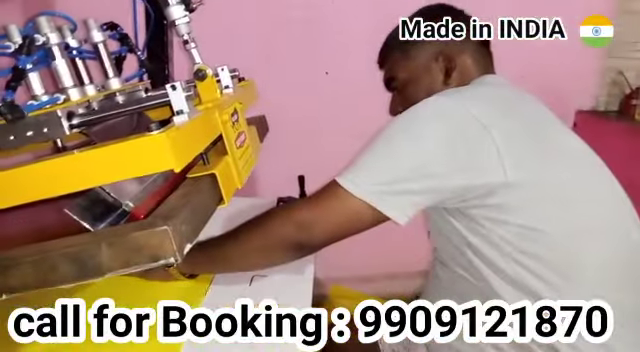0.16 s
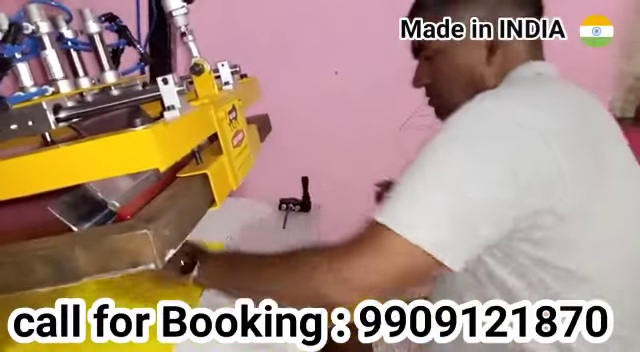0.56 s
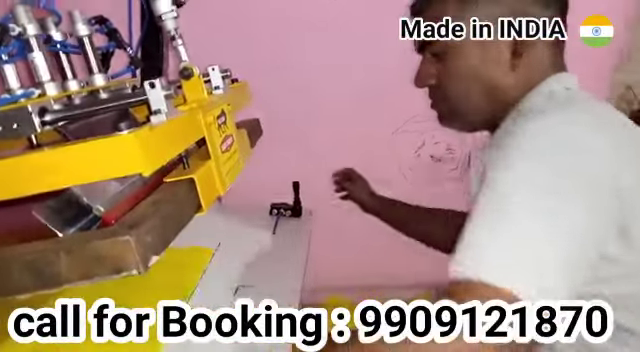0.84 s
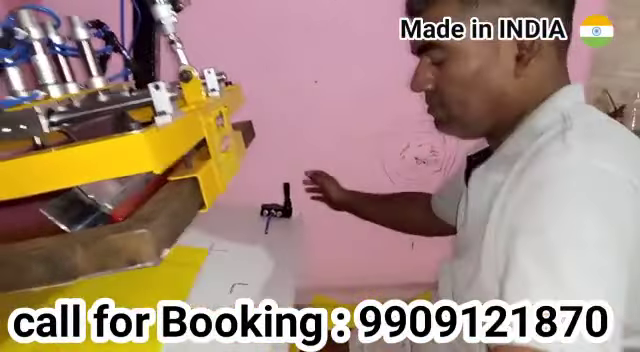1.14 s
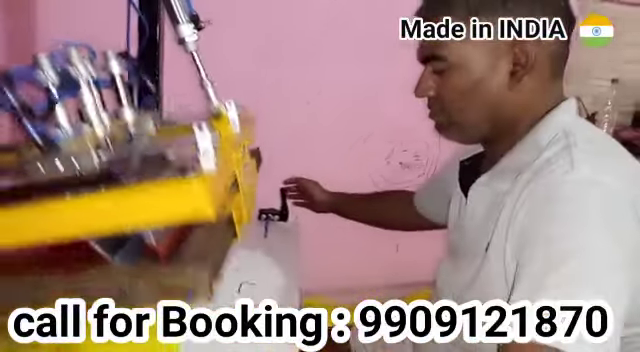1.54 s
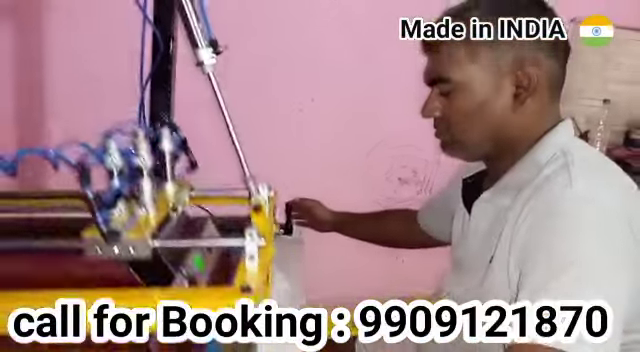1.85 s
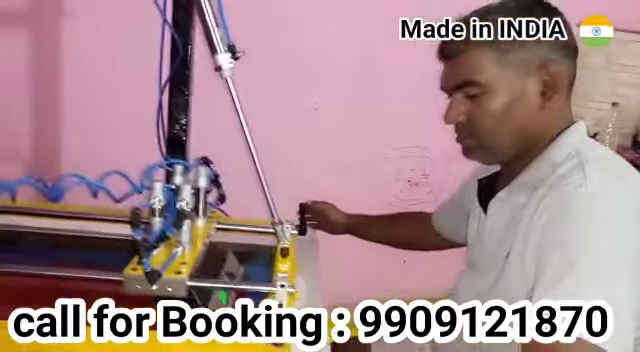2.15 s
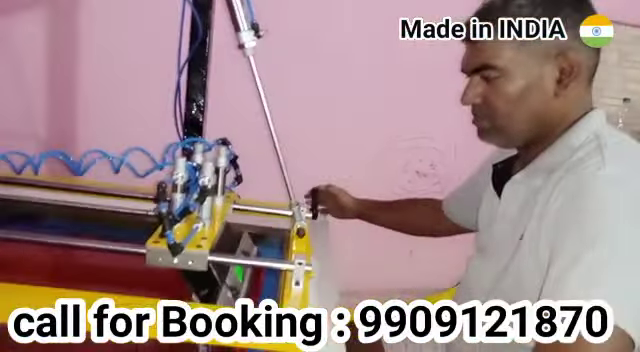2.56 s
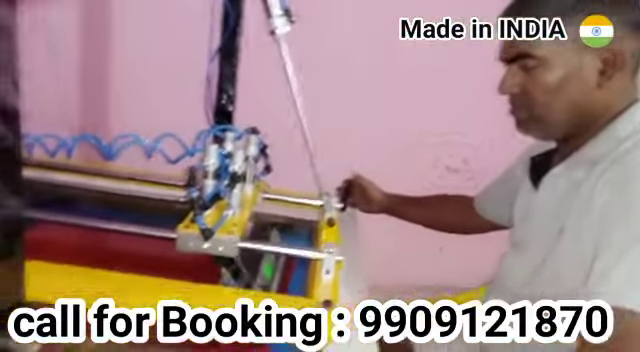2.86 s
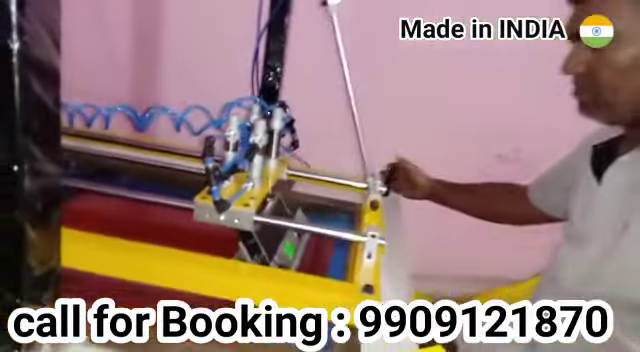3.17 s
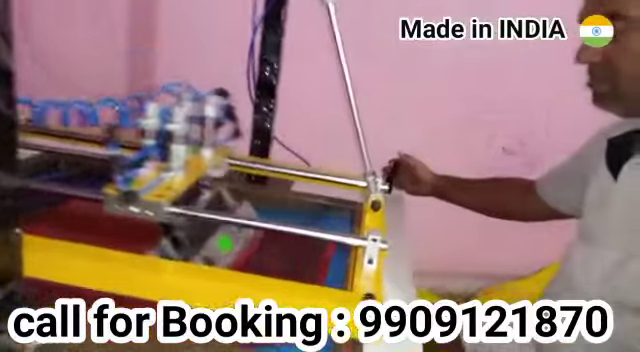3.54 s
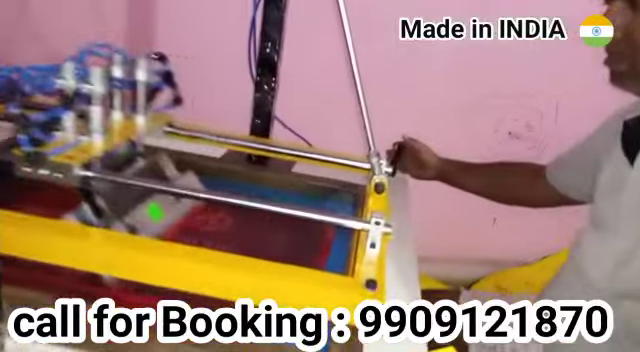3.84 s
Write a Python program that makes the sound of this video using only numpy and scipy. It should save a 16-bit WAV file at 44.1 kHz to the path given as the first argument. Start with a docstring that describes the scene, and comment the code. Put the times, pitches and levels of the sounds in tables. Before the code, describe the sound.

Pneumatic printing machine in a small workshop, close microphone: quiet leaking air and a table knock, a patchy hiss with clunks, a sharp crack and air burst, then a strong long hiss, metal boom and carriage rumble.

```python
"""Air-powered printing machine

In a small hard room a vent dies away and the table is knocked; then three air jets follow.
The frame drops, a valve pops and the carriage cylinder vents: all jets are noise with a colour.
The steel frame booms at each blow and rumbles while parts slide: noise through resonances.
Narrow noise makes whistles and a squeak, short bursts make ticks, a low murmur fills the room.
"""
import sys
import numpy as np
from scipy import signal
from scipy.io import wavfile
from scipy.ndimage import uniform_filter1d

SR = 44100
rng = np.random.default_rng(int(sys.argv[2]) if len(sys.argv) > 2 else 0)


def log_audio(samples):
    """Write samples as a 16-bit WAV file to the path given in sys.argv[1]."""
    # one column per channel
    frames = np.atleast_2d(samples).T
    # limit to full scale, then quantise
    limited = np.clip(frames, -1, 1)
    pcm = np.round(limited * 32767).astype(np.int16)
    wavfile.write(sys.argv[1], SR, pcm)


N = 176400
T = np.arange(N) / SR  # time [s]
PATCH_DB, CALM_PATCH_DB = 5.5, 2.5  # how strongly patches of noise swell and thin out
SPLIT_HZ, LOW_TREBLE_SPLIT_HZ = (1900, 7500), (3000, 7600)  # lower hiss | main hiss | treble


def amp(db):
    """Turns decibels into a gain."""
    return 10 ** (np.asarray(db) / 20)


def evened(x):
    """Scales a signal to an average (RMS) strength of 1."""
    return x / np.sqrt(np.mean(x ** 2) + 1e-20)


def curve(rows, col):
    """Reads a level column as gain, practically silent outside the table."""
    rows = np.array(rows)
    return amp(np.interp(T, rows[:, 0], rows[:, col], left=-150, right=-150))


def band(x, lo_hz, hi_hz):
    """Keeps only the sound between two frequencies."""
    return signal.sosfilt(signal.butter(4, [lo_hz, hi_hz], "band", fs=SR, output="sos"), x)


def resonate(x, hz, width):
    """A resonance of gain 1 whose pitch may move."""
    turn = np.exp(2j * np.pi * np.cumsum(hz * np.ones(len(x))) / SR)
    r = np.exp(-np.pi * width / SR)
    # shift the pitch down to zero, smooth, shift back up
    smooth = signal.lfilter([1 - r], [1, -r], x / turn)
    return 2 * (turn * smooth).real


def fuzzy_tone(noise, hz, width):
    """Noise through the same resonance twice becomes a fuzzy tone."""
    return evened(resonate(resonate(noise, hz, width), hz, width))


def turbulence(hue, ports=(), patch_db=PATCH_DB, size=1024):
    """Short-time spectra of noise with a colour, resonances and drifting patches."""
    frames = N // (size // 4) + 5
    hz = np.fft.rfftfreq(size, 1 / SR)
    real, imag, patches = rng.standard_normal((frames, len(hz), 3)).T
    patches = uniform_filter1d(patches, size=2, axis=0)  # narrow in frequency
    patches = uniform_filter1d(patches, size=22, axis=1)  # long in time
    patches = evened(patches).clip(-2, 2)
    hue_hz, hue_db = np.transpose(hue)
    db = np.interp(np.log(hz + 1), np.log(hue_hz + 1), hue_db, left=-90)
    db = db + sum(lift / (1 + (2 * (hz - c) / w) ** 2) for c, w, lift in ports)
    return hz, (real + 1j * imag) * amp(db[:, None] + patch_db * patches)


def sound(z):
    """Turns short-time spectra into an evened signal."""
    size = 2 * (len(z) - 1)
    return evened(signal.istft(z, nperseg=size, noverlap=size * 3 // 4)[1][:N])


def jet(levels, hue, ports=(), patch_db=PATCH_DB, split_hz=SPLIT_HZ):
    """Escaping air: the lower hiss, main hiss and treble each follow their own level."""
    hz, z = turbulence(hue, ports, patch_db)
    part = np.digitize(hz, split_hz)[:, None]
    return sum(sound(z * (part == k)) * curve(levels, k + 1) for k in range(3))


# long jet: (time [s], lower hiss level [dB], main hiss level [dB], treble level [dB])
STROKE_LEVELS = [(2.705, -52, -65, -87), (2.715, -45, -20.5, -42.5), (2.735, -30.5, -18, -36.5),
                 (2.887, -31, -20, -38), (2.905, -26.5, -18, -38.5), (3.19, -35.5, -22, -41),
                 (3.215, -38, -23.5, -51.5), (3.47, -45.5, -29, -54.5), (4.0, -45.5, -31.5, -58.5)]
# its colour: (frequency [Hz], relative level [dB])
STROKE_COLOUR = [(530, -28), (900, -21), (1500, -15), (2400, -10.5), (3100, -4.5), (4430, 3.5), (5910, -7),
                 (7450, -19.5), (7800, -27), (12600, -30), (13800, -32.5), (15100, -22), (15800, -28)]
# its resonances: (centre [Hz], width [Hz], lift [dB])
STROKE_RESONANCES = [(4417, 60, 2.7), (4870, 37, 3.7)]
# its patches: (time [s], depth [dB])
STROKE_PATCHES = [(3.1, 4), (3.25, 5.5)]


def carriage_vent():
    """The cylinder's long jet hisses on and turns into squeaky streaks from about 3.1 s."""
    frame_time = T[-1] * np.linspace(0, 1, N // 256 + 5)
    depth_db = np.interp(frame_time, *np.transpose(STROKE_PATCHES))
    return jet(STROKE_LEVELS, STROKE_COLOUR, STROKE_RESONANCES, depth_db, LOW_TREBLE_SPLIT_HZ)


# valve jet: (time [s], lower hiss level [dB], main hiss level [dB], treble level [dB])
POP_LEVELS = [(2.21, -33.5, -23, -54), (2.24, -38, -21, -53), (2.334, -40.5, -23.5, -65),
              (2.44, -44.5, -33.5, -88), (2.54, -58.5, -53.5, -101), (2.575, -74, -57, -100),
              (2.61, -52, -52, -100), (2.708, -61, -64.5, -104)]
# its colour: (frequency [Hz], relative level [dB])
POP_COLOUR = [(530, -52), (900, -29), (1230, -3), (1490, -17.5), (1780, -6.5), (2250, -5), (3490, 2.5),
              (5600, -1), (7300, -26.5), (7700, -28), (11000, -40), (15800, -66.5)]
# its resonances: (centre [Hz], width [Hz], lift [dB])
POP_RESONANCES = [(3480, 100, 2.9), (5400, 47, 5.2)]


def valve_pop():
    """Air bursts from the valve as a short, fairly steady hiss with two resonances."""
    return jet(POP_LEVELS, POP_COLOUR, POP_RESONANCES, CALM_PATCH_DB)


# jet of the drop: (time [s], lower hiss level [dB], main hiss level [dB], treble level [dB])
DROP_LEVELS = [(1.46, -76, -60, -80), (1.493, -51, -45, -60), (1.502, -42.5, -37, -47),
               (1.53, -37.5, -32.5, -48), (1.57, -41.5, -38, -51), (1.63, -52, -43.5, -66),
               (1.83, -50, -47, -63.5), (1.9, -59.5, -46.5, -66), (2.16, -66.5, -50, -74),
               (2.185, -43, -48.5, -74), (2.208, -57, -56, -78)]
# its colour: (frequency [Hz], relative level [dB])
DROP_COLOUR = [(530, -36), (900, -8), (1420, -16), (2240, 0), (2850, -1.5), (3980, -1), (6280, -8),
               (8680, -25), (10400, -16), (12600, -33), (15800, -22.5)]
# its resonances: (centre [Hz], width [Hz], lift [dB])
DROP_RESONANCES = [(3203, 70, 7.9), (4040, 47, 5.6)]


def frame_drop():
    """Air escapes as the frame drops: a patchy hiss with two resonances."""
    return jet(DROP_LEVELS, DROP_COLOUR, DROP_RESONANCES)


# last vent: (time [s], lower hiss level [dB], main hiss level [dB], treble level [dB])
DYING_LEVELS = [(0.0, -60, -45.5, -76), (0.1, -63, -53, -77), (0.265, -65, -57.5, -82),
                (0.31, -72, -66, -100), (0.52, -78, -74, -105), (0.535, -68, -65.5, -86),
                (1.46, -77, -71, -93)]
# its colour: (frequency [Hz], relative level [dB])
DYING_COLOUR = [(530, -18), (900, -18.5), (2700, -12), (4300, -4.5), (5400, -6.5), (6280, -14),
                (7980, -28.5), (13000, -38), (15800, -35)]


def dying_vent():
    """The last air leaks out as a weak, calm hiss."""
    return jet(DYING_LEVELS, DYING_COLOUR, patch_db=CALM_PATCH_DB, split_hz=LOW_TREBLE_SPLIT_HZ)


# ways the frame rings: (frequency [Hz], relative level [dB], width [Hz])
FRAME_MODES = [(75, -12.5, 21), (143.5, 1.5, 44), (191, 2.5, 15), (343.5, -4, 39), (506, -7, 93),
               (613, -8, 44), (803, -13, 29)]
# blows on table and frame: (time [s], level [dB], length at 200 Hz [s], brightness [dB per octave])
BLOW_LIST = [(0.253, -39, 0.13, -0.9), (1.525, -50.5, 0.16, -7), (1.617, -44, 0.043, 1),
             (1.68, -36, 0.012, -4), (1.703, -41, 0.014, -3), (1.78, -43, 0.012, -10),
             (2.17, -53, 0.013, 2), (2.218, -47.5, 0.28, 6), (2.806, -37, 0.046, 2.5),
             (2.9, -40.5, 0.18, 3.5)]
BLOW_RISE_S, DARKENING = 0.0058, 0.33  # darkening: how much sooner high modes stop
AFTER_DB, AFTER_S = -28, 0.12  # weak ring that lingers, its length at 200 Hz


def blows():
    """Each blow shakes the modes of the frame; the high modes stop first, the low ones linger."""
    out, t = np.zeros(N + SR), T[:SR]
    for s, db, length, tilt_db in BLOW_LIST:
        noise, ring = rng.standard_normal(SR), 0
        for hz, mode_db, width in FRAME_MODES:
            age = t / length * (hz / 200) ** DARKENING
            linger = amp(AFTER_DB) * np.exp(-t / AFTER_S * (hz / 200) ** 2)
            shape = np.exp(-age ** 2) + linger
            gain = amp(mode_db + tilt_db * np.log2(hz / 200))
            ring = ring + gain * shape * fuzzy_tone(noise, hz, width)
        out[round(s * SR):][:SR] += amp(db) * ring * np.minimum(t / BLOW_RISE_S, 1)
    return out[:N]


# frame shaken by sliding parts: (time [s], bass level [dB], low mids level [dB])
RUMBLE_LEVELS = [(1.54, -50, -62), (1.612, -52, -51), (1.63, -40, -46.5), (1.82, -44.5, -58),
                 (1.9, -51, -79), (2.15, -65, -86), (2.215, -46, -42.5), (2.4, -46.5, -46.5),
                 (2.5, -51.5, -59.5), (2.68, -65, -75), (2.808, -47, -60), (2.82, -44.5, -40.5),
                 (2.98, -38, -37.5), (3.2, -46, -51.5), (3.4, -55.5, -73), (3.56, -74, -69),
                 (3.75, -52, -55.5), (4.0, -34.5, -52.5)]


def rumble():
    """Sliding parts shake the frame: resonant bass noise and a band of low mids."""
    noise = rng.standard_normal((2, N))
    bass = evened(resonate(band(noise[0], 52.0, 130), 71.5, 28))
    mids = evened(band(noise[1], 165, 1150))
    return bass * curve(RUMBLE_LEVELS, 1) + mids * curve(RUMBLE_LEVELS, 2)


# carriage gathering speed on its rails: (time [s], level [dB], centre [Hz])
CARRIAGE_ROLL = [(3.4, -73, 193), (3.48, -45, 185), (3.6, -44, 281), (4.0, -43.5, 423)]


def carriage():
    """The carriage's fuzzy drone rises in pitch as it speeds up on the rails."""
    s, _, hz = np.transpose(CARRIAGE_ROLL)
    hz = np.interp(T, s, hz)
    return fuzzy_tone(rng.standard_normal(N), hz, width=138) * curve(CARRIAGE_ROLL, 1)


# whistles, squeaks and hums: (start [s], end [s], frequency [Hz], width [Hz], level [dB])
# rows that end before they start stay silent
WHISTLE_LIST = [(0.11, 0.25, 80, 35, -57), (0.24, 0.86, 5250, 340, -66), (0.68, 1.25, 3495, 52, -69),
                (1.006, 1.1, 260, 68, -60.5), (1.45, 2.19, 880, 81, -55.5), (1.67, 1.93, 612, 33, -54),
                (1.82, 2.174, 2330, 110, -51), (2.16, 2.52, 222, 60, -41), (2.26, 2.58, 3800, 210, -43.5),
                (2.585, 2.645, 1860, 450, -44), (2.583, 2.73, 2490, 430, -45.5),
                (2.588, 2.67, 660, 107, -51), (3.01, 3.37, 1020, 49, -49), (3.15, 3.33, 1440, 40, -46),
                (3.3, 3.1, 2170, 34, -42), (3.24, 3.63, 2200, 77, -48), (3.72, 4, 1480, 78, -56.5),
                (3.188, 3.35, 5500, 40, -30.5), (3.332, 3.439, 4325, 80, -26.5),
                (3.265, 3.41, 5650, 94, -35), (3.6, 3.834, 141, 44, -42.5), (3.47, 3.66, 715, 100, -55),
                (3.87, 3.86, 2860, 110, -35.5)]
WHISTLE_SKEW, SWELL_ROUNDNESS = 0.64, 0.75  # skew below 1 puts the peak early


def whistles():
    """Narrow resonances turn noise into fuzzy tones that swell and fade."""
    out = np.zeros(N)
    for start, end, hz, width, db in WHISTLE_LIST:
        span = slice(round(start * SR), round(end * SR))
        noise = rng.standard_normal(N)[span]
        swell = np.sin(np.pi * np.linspace(0, 1, len(noise)) ** WHISTLE_SKEW).clip(0)
        out[span] += amp(db) * fuzzy_tone(noise, hz, width) * swell ** SWELL_ROUNDNESS
    return out


# gliding squeak: (time [s], level [dB], frequency [Hz])
SQUEAK_GLIDE = [(2.552, -55, 1350), (2.574, -48.5, 1480), (2.61, -41.5, 1810), (2.68, -56, 1490)]


def squeak():
    """A part squeaks upward as it seats, then sinks: one fuzzy tone on a gliding pitch."""
    s, _, hz = np.transpose(SQUEAK_GLIDE)
    hz = np.interp(T, s, hz)
    return fuzzy_tone(rng.standard_normal(N), hz, width=250) * curve(SQUEAK_GLIDE, 1)


# bright ticks: (time [s], peak level [dB], centre [Hz], length [s])
TICK_LIST = [(1.27, -55.5, 5240, 0.0044), (2.214, -6.5, 4750, 0.0028)]


def ticks():
    """A faint tick and the crack of the valve: very short bursts of bright noise."""
    out = np.zeros(N)
    for s, db, hz, length in TICK_LIST:
        noise = band(rng.standard_normal(N), 0.75 * hz, 1.245 * hz)
        burst = noise * np.exp(-((T - s) / length) ** 2)
        out += amp(db) * burst / abs(burst).max()
    return out


# colour of the room murmur: (frequency [Hz], relative level [dB])
ROOM_COLOUR = [(30, -55), (70, 2), (166, -2), (241, -4.5), (433, -9.5), (1200, -20)]
ROOM_DB = -69.5


def room():
    """The low murmur of the workshop: calm noise below 1000 Hz."""
    hz, z = turbulence(ROOM_COLOUR, patch_db=CALM_PATCH_DB, size=2048)
    return amp(ROOM_DB) * sound(z * (hz < 1000)[:, None])


def scene():
    """Adds all sources and puts the same sound in both channels."""
    air = carriage_vent() + valve_pop() + frame_drop() + dying_vent()
    machine = blows() + rumble() + carriage() + whistles() + squeak() + ticks()
    mono = air + machine + room()
    return np.array([mono, mono])


LOW_CUT_HZ, EDGE_HZ = 80, 15800


def record(dry):
    """The microphone weakens the deep bass; then a steep filter removes the highest treble."""
    thin = signal.sosfilt(signal.butter(2, LOW_CUT_HZ, "high", fs=SR, output="sos"), dry)
    lowpass = signal.firwin(1501, EDGE_HZ, window=("kaiser", 9), fs=SR)
    return signal.oaconvolve(thin, lowpass[None], "same", axes=1)


dry = scene()
out = record(dry)
log_audio(out)
```